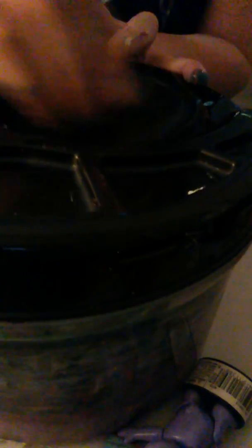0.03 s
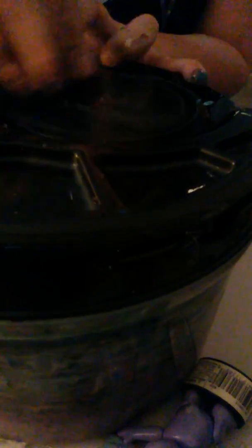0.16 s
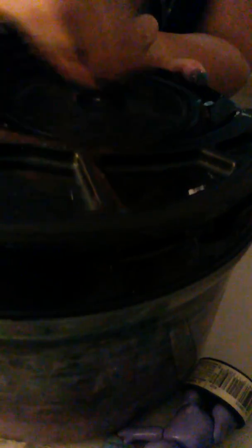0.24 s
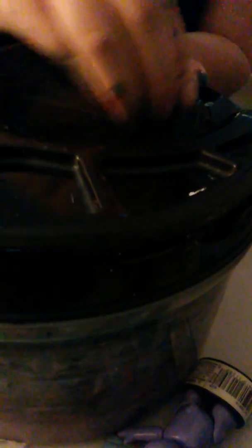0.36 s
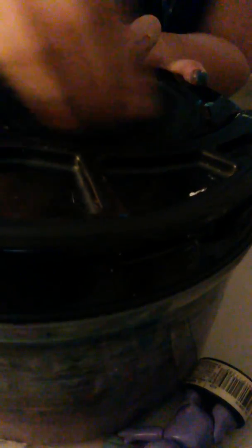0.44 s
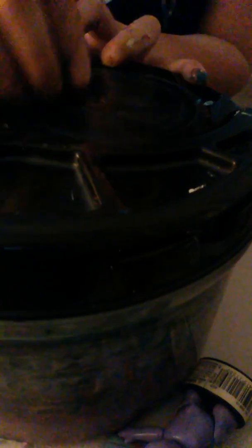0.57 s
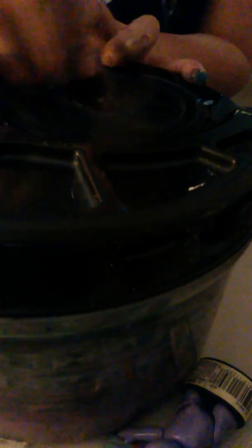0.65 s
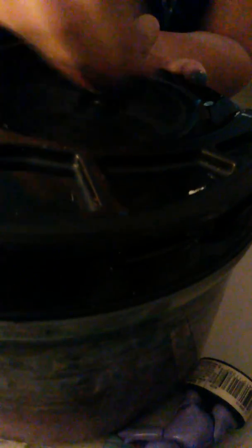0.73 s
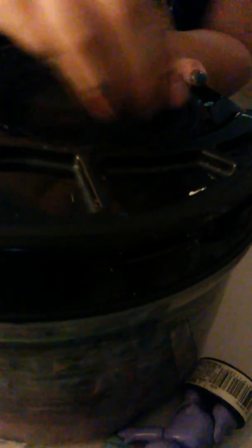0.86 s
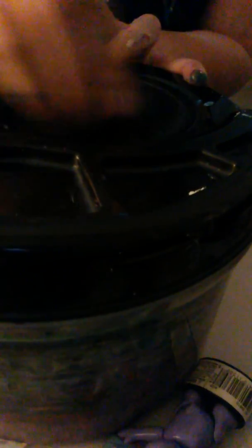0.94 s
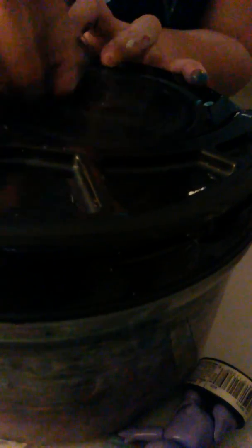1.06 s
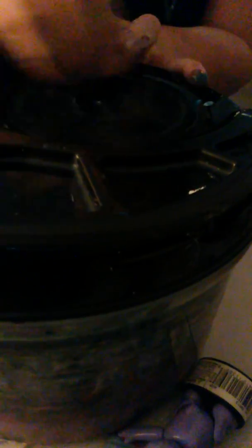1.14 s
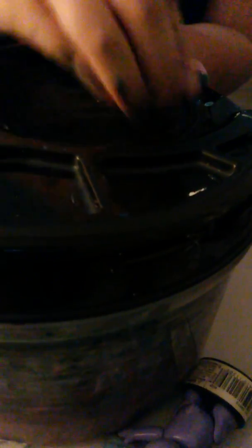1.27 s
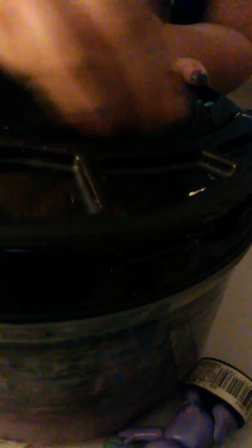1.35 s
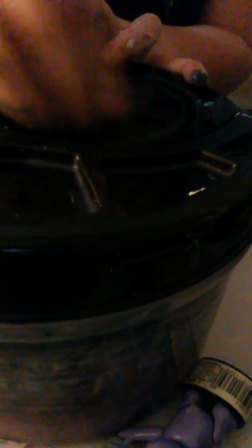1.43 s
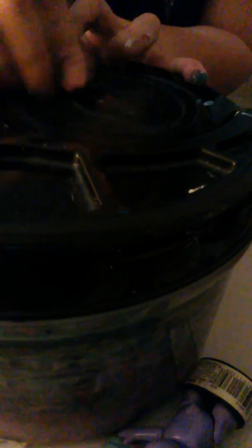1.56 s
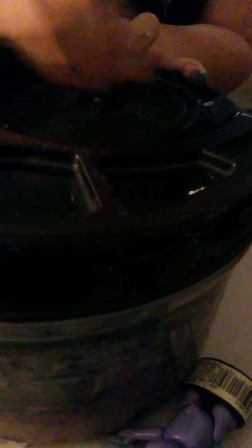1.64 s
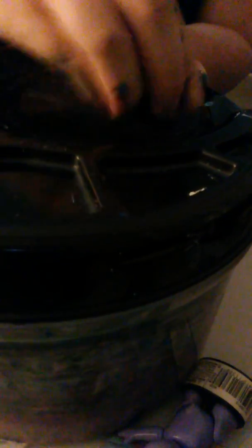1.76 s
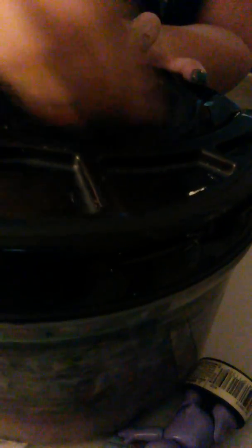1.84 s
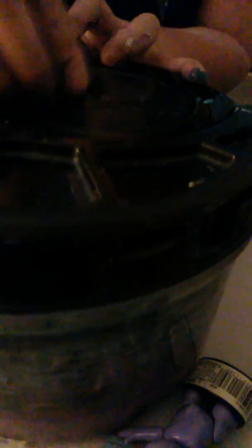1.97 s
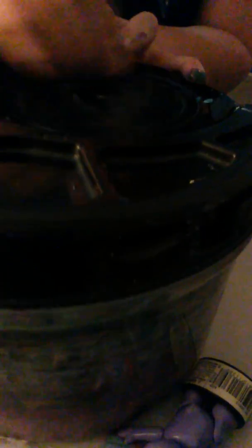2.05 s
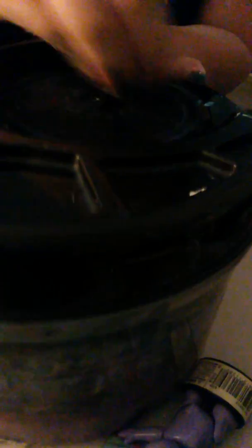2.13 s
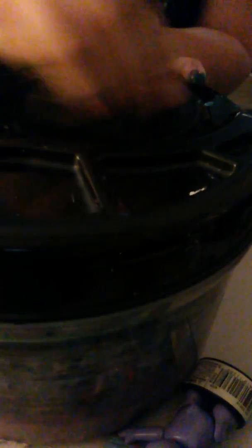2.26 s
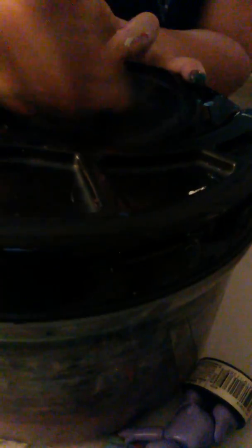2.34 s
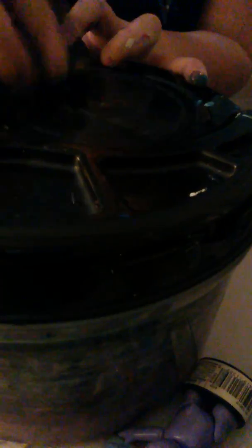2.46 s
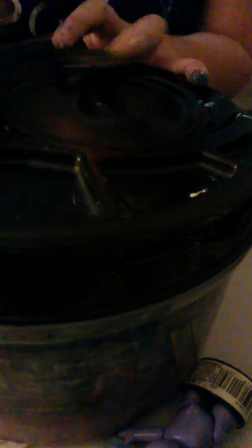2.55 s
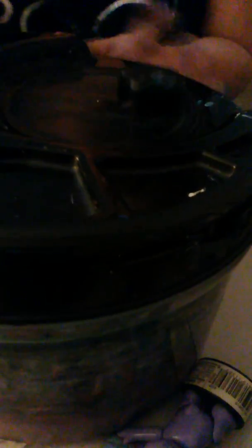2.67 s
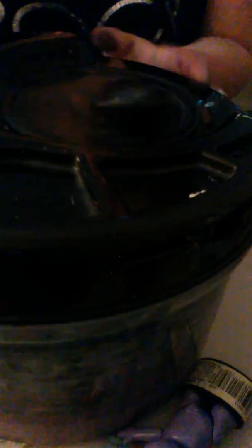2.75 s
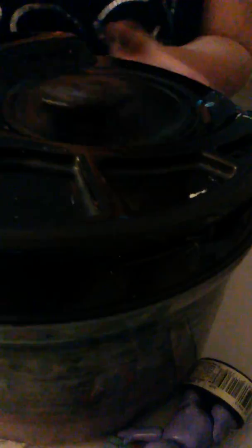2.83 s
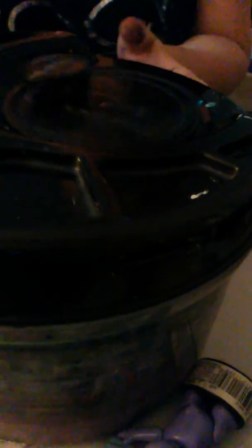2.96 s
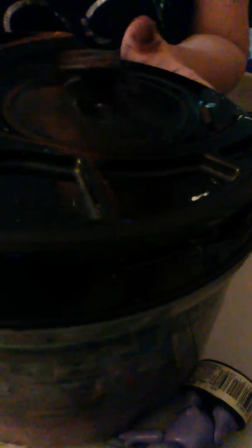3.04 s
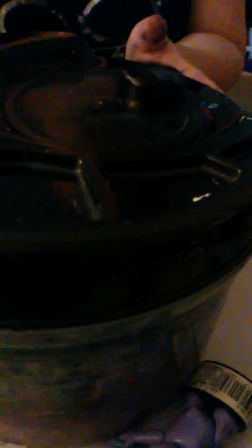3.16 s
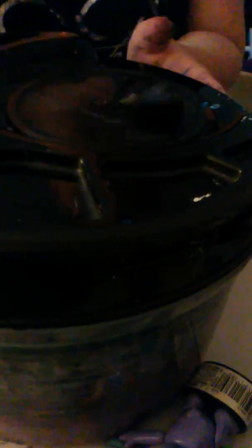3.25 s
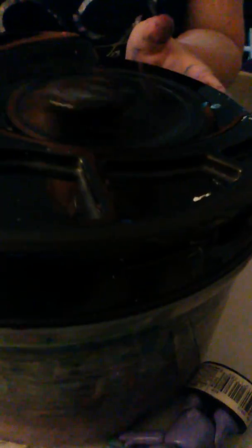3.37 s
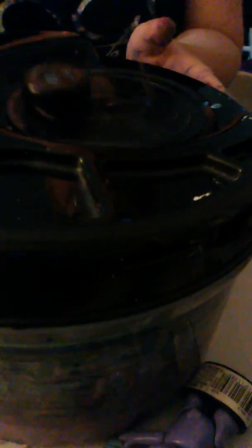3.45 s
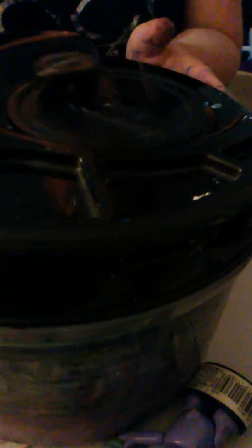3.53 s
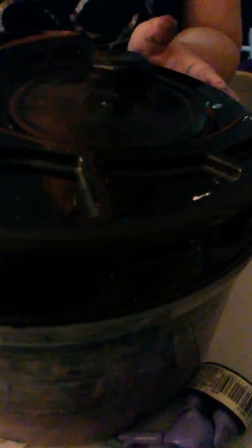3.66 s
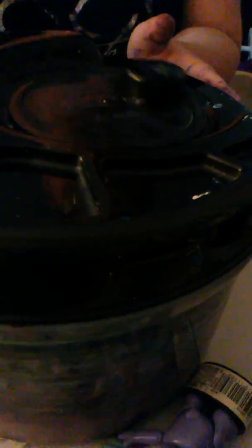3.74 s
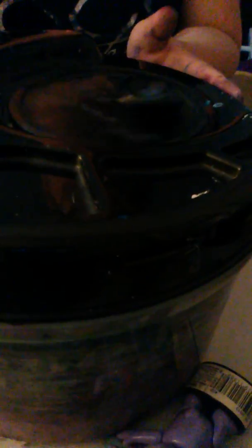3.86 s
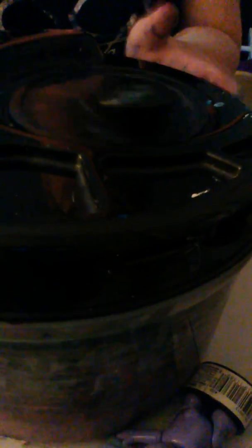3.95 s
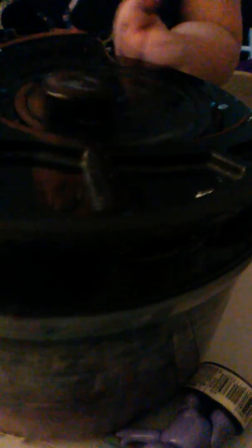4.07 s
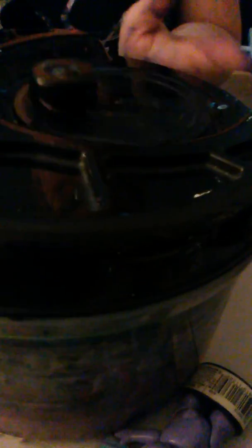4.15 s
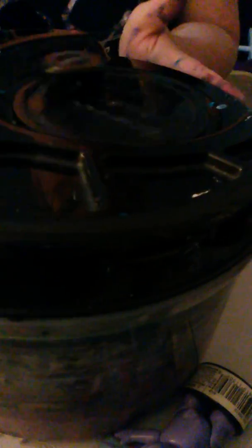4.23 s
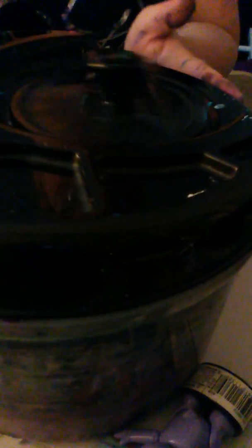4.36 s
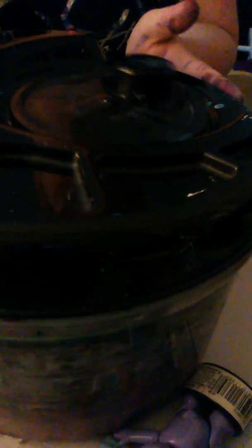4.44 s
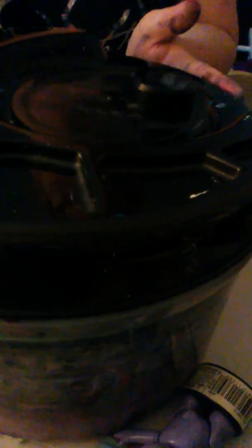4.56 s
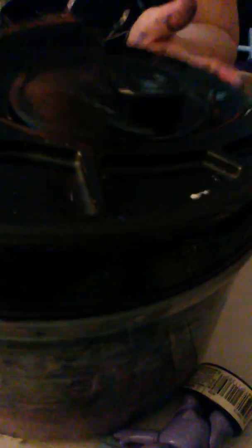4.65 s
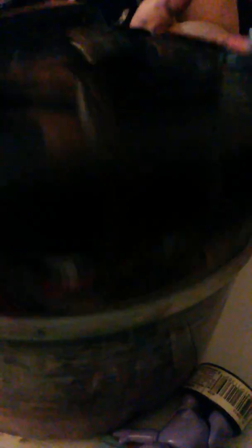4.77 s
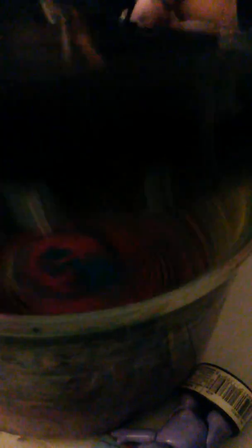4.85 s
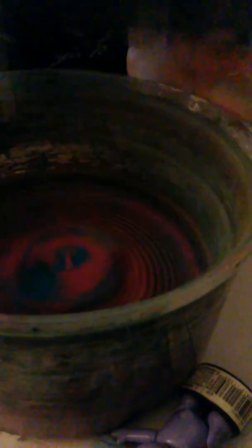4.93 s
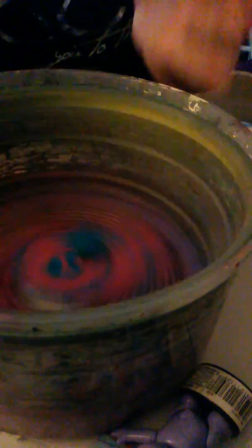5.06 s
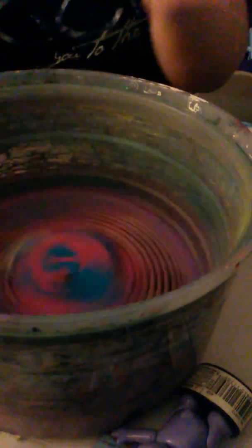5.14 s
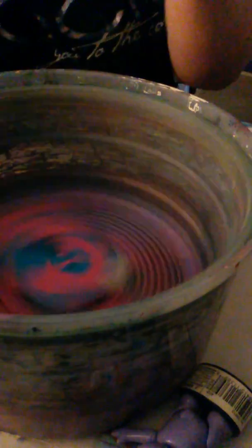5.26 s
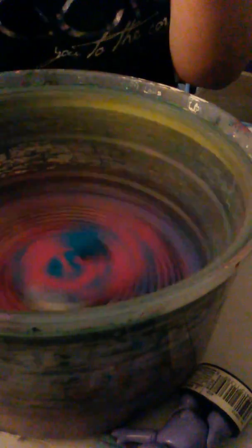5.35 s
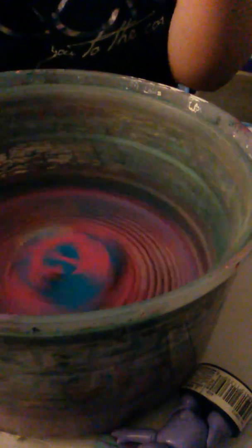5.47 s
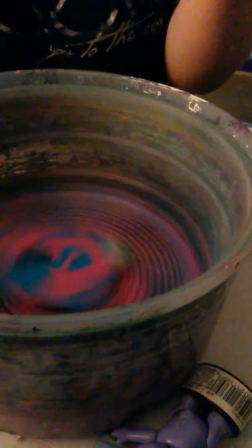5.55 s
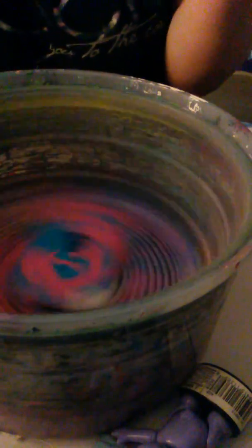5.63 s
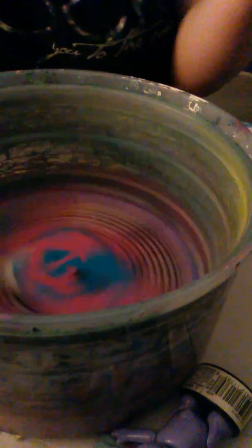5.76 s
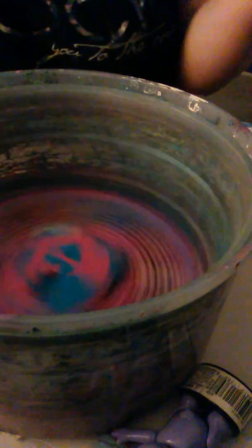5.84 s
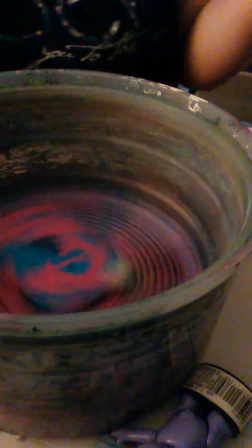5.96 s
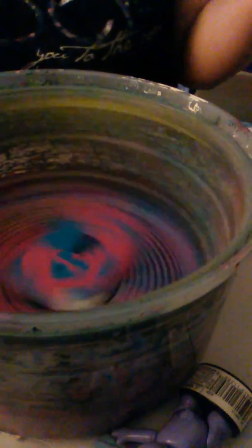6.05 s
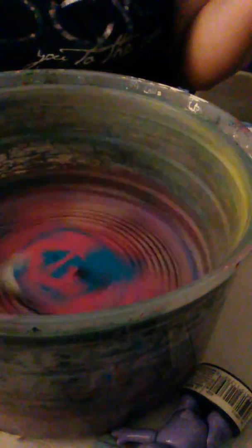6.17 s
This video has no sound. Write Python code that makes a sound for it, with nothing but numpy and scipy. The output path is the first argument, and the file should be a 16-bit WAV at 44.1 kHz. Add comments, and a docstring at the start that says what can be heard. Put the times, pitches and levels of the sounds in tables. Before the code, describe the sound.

A hollow plastic bowl rumbles in irregular surges as its basket is cranked, gears whirring low and thudding against the lid. Let go, it rattles loosely and gradually weakens, with small clicks and rubbing swishes. The lid is pulled away with a rapid crackling clatter and bright hiss; a few small knocks and cloth-like rustles follow. Close microphone, short indoor room tail, very faint background hush.

```python
"""Indoors, a plastic salad spinner is cranked by hand: basket and gears rumble and chatter in the hollow bowl.
The knob is let go and the basket coasts with a loose rattle; then the lid is pulled off with a clatter,
leaving a hiss of sliding plastic at first, then soft rustles, probably of clothing, and faint ticks.
Random contacts and impacts drive filters that stand for bowl, lid, edges and axle; a short room tail
and a faint hush surround them."""
import sys
import numpy as np
from scipy import signal
from scipy.fft import rfft, irfft, next_fast_len
from scipy.io import wavfile
from scipy.ndimage import uniform_filter1d, map_coordinates

SR = 44100
rng = np.random.default_rng(int(sys.argv[2]) if len(sys.argv) > 2 else 0)


def unload_wav(signal):
    """Save mono or channel-first audio to the path in sys.argv[1] as 16-bit WAV at rate SR, clipped to [-1, 1]."""
    wavfile.write(
        sys.argv[1],
        SR,
        np.round(np.clip(np.atleast_2d(signal).T, -1, 1) * 32767).astype(np.int16),
    )


N = 273420

# Times in seconds: the knob is let go, the lid leaves the bowl.
STAGE_STARTS_S = [2.54, 4.72]
# Responses of the bowl when cranked, coasting and open. Each row: frequency in Hz, relative level in dB.
CRANKED_BOWL = [(25, -45), (45, -54.5), (75, -19), (105, -5), (145, 0.5), (225, 0.5), (300, -5.5),
                (400, 0.5), (500, -7), (570, -18.5), (660, -40.5), (1000, -66)]
COASTING_BOWL = [(25, -50.5), (55, -16), (100, -7.5), (150, -1), (240, 0.5), (330, 3.5), (490, -1.5),
                 (570, -11.5), (660, -30), (800, -21.5), (1200, -73)]
OPENED_BOWL = [(25, -56.5), (80, -12.5), (170, -12.5), (260, -3.5), (330, 1), (430, -4.5), (500, -3.5),
               (570, -21), (680, -43), (1200, -70.5)]
# Responses of hard edges, bright snaps and hiss. Each row: frequency in Hz, relative level in dB.
EDGE_RESPONSE = [(1200, -33), (1900, -3.5), (2250, 3), (2550, 8), (2900, 1), (3400, -4.5), (3900, -13),
                 (4400, -5), (4900, -15.5), (5600, 0), (7500, -29)]
SNAP_RESPONSE = [(3500, -46), (4900, -12), (5600, -6.5), (7000, 0.5), (8200, -5), (10700, 8.5),
                 (13000, 1.5), (16000, -1)]
HISS_RESPONSE = [(2760, -46.5), (4700, -29), (4870, -44.5), (5230, -16), (5480, -17), (6070, -14.5),
                 (7270, -7.5), (8130, -11.5), (10700, 2), (14500, -6), (15400, -13), (16000, -4)]
# Lid resonances when seated, riding loose and lifted. Each row: centre in Hz, width in Hz, relative level in dB.
SEATED_LID = [(860, 76, 2.5), (964, 99, 1), (1100, 76, -9), (1398, 188, -3.5), (1473, 67, 5),
              (1574, 83, -1.5)]
RIDING_LID = [(831, 90, -2), (983, 140, 5), (1115, 110, -2), (1460, 390, -7.5), (1520, 140, 1.5),
              (1760, 100, -6.5)]
LIFTED_LID = [(901, 81, -12.5), (1086, 70, 2), (1270, 216, 0.5), (1369, 98, 4), (1546, 54, 3.5),
              (1690, 80, -20), (1663, 30, 1.5)]


def amp(db):
    """Decibels to gain."""
    return 10 ** (np.asarray(db) / 20)


def unit(x):
    """x at rms 1."""
    return x / np.sqrt(np.mean(x ** 2) + 1e-20)


def along(points, hz):
    """(Hz, value) points read on a log frequency axis."""
    f, v = np.transpose(points)
    return np.interp(np.log(hz + 1), np.log(f + 1), v)


def curves(rows):
    """One value per sample for each column after the time."""
    s, *cols = np.transpose(rows)
    return [np.interp(np.arange(N) / SR, s, c) for c in cols]


def wobble(rate):
    """A smooth random curve, rate knots a second."""
    knots = rng.standard_normal(int(N * rate / SR) + 4)
    return map_coordinates(knots, [np.arange(N) * rate / SR])


def body(spectrum, size=8192):
    """Causal, minimum-phase impulse response of a body with this spectrum."""
    gain = amp(along(spectrum, np.fft.rfftfreq(size, 1 / SR)))
    cepstrum = irfft(np.log(gain))
    cepstrum[1:size // 2] *= 2
    cepstrum[size // 2 + 1:] = 0
    return irfft(np.exp(rfft(cepstrum)))[:size // 2]


def focus(hz, centre_hz, db_per_octave):
    """Level change in dB, negative for resonances away from those that a contact excites best."""
    return -db_per_octave * np.abs(np.log2(hz / centre_hz))


def struck(spectrum, centre_hz, db_per_octave):
    """A body's response to a contact that favours the resonances near centre_hz."""
    return body([(hz, db + focus(hz, centre_hz, db_per_octave)) for hz, db in spectrum])


def shell(modes, size=4096):
    """Impulse response of the lid, which radiates mainly around its resonances."""
    f = np.fft.rfftfreq(size, 1 / SR)
    response = 0
    for k, (hz, width_hz, db) in enumerate(modes):
        resonance = 1j * f * width_hz / (hz * hz - f * f + 1j * f * width_hz)
        response = response + (-1) ** k * amp(db) * resonance
    radiation = signal.butter(3, [760, 1900], "bandpass", fs=SR, output="sos")
    return signal.sosfilt(radiation, irfft(response))


def contacts(rate, spread_db, smooth):
    """Tiny impacts at random times and of uneven size, over a share of smooth friction."""
    sizes = amp(spread_db * np.clip(rng.standard_normal(N), -2, 2)) * rng.choice([-1, 1], N)
    impacts = sizes * (rng.random(N) < rate / SR)
    return unit(impacts) + smooth * rng.standard_normal(N)


def ring(force, response):
    """A body driven by a force, at rms 1."""
    return unit(signal.fftconvolve(force, response)[:N])


def blow(response, t60, scuff, rise, size=6000, count=440):
    """One impact with a short chatter after it, at rms 1 over its first 10 ms."""
    t = np.arange(size) / SR
    force = rng.standard_normal(size) * amp(-60 * t / t60) * (1 - np.exp(-t / rise))
    force *= scuff / np.linalg.norm(force)
    force[0] += 1
    sound = signal.fftconvolve(force, response)[:size]
    return sound / np.sqrt(np.mean(sound[:count] ** 2))


def add(track, s, sound):
    """Mix a sound into the track at time s."""
    part = track[round(s * SR):][:len(sound)]
    part += sound[:len(part)]


def band(centre_hz, width_hz):
    """Narrow noise of rms 1 around a moving centre."""
    phase = 2 * np.pi * np.cumsum(centre_hz) / SR
    return unit(wobble(width_hz) * np.cos(phase) + wobble(width_hz) * np.sin(phase))


def patchy(x, depth_db, size=512, count=3):
    """A smooth random gain over pitch and time makes the sound swell and fade in patches; rms 1."""
    z = signal.stft(x, nperseg=size)[2]
    field = uniform_filter1d(rng.standard_normal(z.shape), count, 0)
    field = uniform_filter1d(field, 2 * count, 1)
    shaped = signal.istft(z * amp(depth_db * unit(field)), nperseg=size)[1]
    return unit(shaped[:len(x)])


def swell(s, length):
    """Envelope of a contact that is full at time s, sags from then on and dies away after its length."""
    attack_s, release_s, sag_db_per_s = 0.02, 0.05, 16.5
    t = np.arange(N) / SR - s
    attack = np.clip(1 + t / attack_s, 0, 1)
    sag = amp(-sag_db_per_s * np.maximum(t, 0))
    return attack * sag * np.exp(-np.maximum(t - length, 0) / release_s)


def stages():
    """Weights per sample of the three stages: cranked, coasting, open."""
    stage = np.searchsorted(STAGE_STARTS_S, np.arange(N) / SR)
    return uniform_filter1d(np.eye(3)[:, stage], size=440, axis=1)  # 10 ms crossfade


def hush():
    """Faint steady room noise: white noise through a fixed spectrum."""
    # Each row: frequency in Hz, relative level in dB.
    hush_response = [(20, -25.5), (55, -6.5), (120, -3), (220, -19.5), (480, -5), (700, -19.5),
                     (2600, -20.5), (4700, -28), (10000, -6.5), (16000, -14)]
    return amp(-64.5) * ring(rng.standard_normal(N), body(hush_response))


def room(x):
    """A small room's tail, 5 ms late; each frequency dies at its own speed."""
    # Each row: frequency in Hz, 60 dB decay time in seconds.
    decay_s = [(150, 0.26), (1500, 0.31), (5000, 0.35), (14000, 0.15)]
    hz, t, z = signal.stft(rng.standard_normal(SR // 2), SR, nperseg=256)
    fade = amp(-60 * t / along(decay_s, hz)[:, None])
    tail = signal.istft(z * fade, SR, nperseg=256)[1]
    delayed = np.pad(x, (SR // 200, 0))
    return signal.fftconvolve(delayed, tail / np.linalg.norm(tail))[:N]


def rock():
    """The bowl is nudged once on the table: a dull thump of noise through the whole bowl."""
    # Each row: frequency in Hz, relative level in dB.
    base_response = [(25, -52), (70, -5), (140, 1.5), (200, -1.5), (400, -46)]
    centre_s, width_s, level_db = 4.14, 0.046, -32
    tilt = np.exp(-((np.arange(N) / SR - centre_s) / width_s) ** 2 / 2)
    return amp(level_db) * tilt * ring(rng.standard_normal(N), body(base_response))


def axle():
    """The axle rubs in its seat; when it presses harder, a gritty swish rises out of the rub."""
    # Each row: time in seconds, rub level in dB.
    rub_level = [(0, -56), (0.75, -52.5), (1.1, -59), (1.25, -58), (1.58, -59.5), (1.9, -53.5), (2.1, -59),
                 (2.4, -53.5), (2.56, -49.5), (2.8, -56.5), (3.9, -60), (4.12, -54.5), (4.4, -59.5),
                 (4.7, -53.5), (5.13, -57.5), (5.7, -79.5)]
    # Each row: frequency in Hz, relative level in dB.
    rub_response = [(1700, -28.5), (2100, -14.5), (2500, 5.5), (2850, -1), (3400, -3), (3900, -22.5),
                    (4400, -7.5), (4900, -27), (5500, -12.5), (6500, -43)]
    # Hard presses. Each row: start in seconds, length in seconds, level in dB.
    swishes = [(0.17, 0.12, -54), (0.56, 0.05, -50), (1.02, 0.027, -48.5), (1.22, 0.04, -50),
               (1.44, 0.042, -54), (1.83, 0.047, -52), (1.95, 0.035, -54), (2.275, 0.07, -48.5),
               (2.42, 0.069, -53), (2.87, 0.084, -53.5), (3.35, 0.11, -54), (3.81, 0.06, -54.5),
               (4.05, 0.057, -47), (4.58, 0.12, -57.5)]
    start_hz, rise_hz, rise_s = 2750, 510, 0.044  # a swish climbs as the pressure builds
    rub_db, = curves(rub_level)
    rub_contacts = contacts(rate=1700, spread_db=8, smooth=0.35)
    rub = patchy(ring(rub_contacts, body(rub_response)), depth_db=4.0)
    pressure = np.array([amp(db) * swell(s, length) for s, length, db in swishes])
    strongest_start_s = np.array(swishes)[pressure.argmax(axis=0), 0]
    age_s = np.maximum(np.arange(N) / SR - strongest_start_s, 0)
    swish_hz = start_hz + rise_hz * (1 - np.exp(-age_s / rise_s))
    grit = patchy(band(swish_hz, width_hz=850) * amp(4.8 * wobble(260)), depth_db=5.0)
    return amp(rub_db + 1.8 * wobble(30)) * rub + pressure.sum(axis=0) * grit


def slide():
    """Fine, grainy hiss of sliding plastic that sinks while coasting; later soft rustles, probably of clothing."""
    # Hiss with the lid off: sliding plastic at first, then soft rustles. Each row: time in seconds, level in dB.
    open_level = [(4.72, -39.5), (4.76, -31), (4.9, -44), (5.02, -46), (5.14, -52), (5.25, -41.5),
                  (5.37, -42.5), (5.45, -50.5), (5.57, -44.5), (5.63, -52), (5.71, -40), (5.79, -54),
                  (6.0, -48.5), (6.09, -40.5), (6.14, -43.5), (6.2, -50.5)]
    cranked_db, release_db, sag_db, sag_s = -49.5, -48, 5.5, 0.7
    open_db, = curves(open_level)
    cranked, coasting, opened = stages()
    free_s = np.maximum(np.arange(N) / SR - STAGE_STARTS_S[0], 0)
    coasting_db = release_db - sag_db * (1 - np.exp(-free_s / sag_s))
    slide_db = cranked * cranked_db + coasting * coasting_db + opened * open_db
    grain = contacts(rate=900, spread_db=10.0, smooth=1.3)
    hiss = patchy(ring(grain, body(HISS_RESPONSE)), depth_db=2.9)
    return amp(slide_db + 2.6 * wobble(45)) * hiss


def scrape():
    """The lid's edge catches and slips on the rim as it is pulled off: a dense run of contacts."""
    start_s, length_s, level_db = 4.74, 0.19, -43
    slips = contacts(rate=310, spread_db=6, smooth=.25)
    scraped = ring(slips, body(EDGE_RESPONSE)) + 0.8 * ring(slips, body(SNAP_RESPONSE))
    return amp(level_db) * swell(start_s, length_s) * scraped


def grazes(count=5):
    """(s, dB) of one graze per revolution of the slowing basket, each revolution longer than the last."""
    start_s, revolution_s, slowing, graze_db = 3.323, 0.131, 1.024, -35.5  # dB as in the tick table
    return [(start_s + revolution_s * np.sum(slowing ** np.arange(k)), graze_db) for k in range(count)]


def ticks():
    """The rim grazes the wall too lightly to move the bowl: short bright blows through the hiss response."""
    # Stray ticks of the basket's rim. Each row: time in seconds, level in dB before the common trim.
    stray_ticks = [(0.6794, -33.5), (0.883, -35.5), (1.8921, -40), (1.9495, -33), (2.123, -36.5),
                   (3.3862, -38), (4.098, -29), (4.182, -35.5), (4.4059, -36.5), (4.4593, -33.5),
                   (4.6365, -26.5), (4.6906, -32.5), (5.8177, -37.5)]
    trim_db = -7.0
    out, rim = np.zeros(N), body(HISS_RESPONSE)
    for s, db in list(stray_ticks) + grazes():
        add(out, s, amp(db + trim_db) * blow(rim, t60=0.055, scuff=8, rise=0.0023))
    return out


def knocks():
    """Crank, basket and lid knock: each thuds in the bowl, rings the lid, clacks and snaps at hard edges."""
    # Each row: time in seconds, bowl thud in dB, lid ring in dB, ring centre in Hz, edge clack in dB,
    # clack centre in Hz, snap in dB; all levels before the trims below.
    knock_rows = [(0.531, -44, -51, 1570, -26, 2800, -21.5), (0.604, -9, -30.5, 1150, -34, 2800, -49),
                  (0.728, -22, -41, 1020, -65, 2800, -49), (0.746, -10.5, -43, 1060, -46, 2800, -44),
                  (0.792, -17.5, -29.5, 1370, -33, 2800, -55), (0.799, -31.5, -22.5, 1440, -50, 2500, -53),
                  (1.086, -15, -49, 1420, -65, 3000, -46), (1.2, -13, -34.5, 1453, -47.5, 3100, -57),
                  (1.211, -28, -26.5, 1490, -42, 2800, -61), (1.321, -38, -27.5, 1430, -27.5, 4300, -33),
                  (1.639, -12, -38, 1200, -39, 3000, -48), (1.69, -13.5, -39.5, 1340, -40.5, 3000, -32),
                  (1.989, -18, -51, 1070, -46, 2600, -55), (2.172, -25, -42.5, 1388, -47.5, 2700, -39),
                  (2.482, -17, -28.5, 1060, -34.5, 2900, -62), (2.545, -11.5, -29, 1180, -27.5, 2900, -60),
                  (2.55, -16, -27, 1409, -29.5, 3000, -32.5), (2.67, -21.5, -28, 1000, -41.5, 2800, -38),
                  (2.746, -27.5, -33, 950, -67, 3100, -63), (3.009, -38, -33, 1010, -43, 2900, -42),
                  (3.226, -20.5, -55, 1070, -47.5, 2900, -54), (3.453, -51, -26, 1310, -31, 2700, -29.5),
                  (3.563, -20, -36, 1023, -47, 2700, -48), (3.62, -25, -36, 1022, -52, 2600, -65.5),
                  (3.778, -20, -42, 1040, -48, 2600, -63), (3.923, -19.5, -35, 1130, -52.5, 2700, -64),
                  (4.031, -46, -42.5, 1300, -39.5, 2600, -35.5),
                  (4.111, -41.5, -22.5, 1520, -29.5, 3000, -37),
                  (4.34, -21.5, -34, 1012, -64.5, 2700, -56.5), (4.537, -36.5, -43, 1346, -34.5, 2600, -33),
                  (4.728, -14.5, -30.5, 1128, -24, 3100, -19), (4.742, -26, -35.5, 1118, -39, 3300, -20),
                  (4.806, -35, -32, 1260, -27.5, 3200, -21.5), (4.839, -28, -31.5, 1380, -25.5, 3400, -22),
                  (4.856, -31, -24, 1500, -29.5, 3200, -28), (4.885, -37, -39.5, 1620, -37.5, 3500, -25),
                  (4.925, -43.5, -32, 1440, -32, 3000, -45), (4.948, -30.5, -25.5, 1500, -24, 3000, -25.5),
                  (4.978, -45, -37.5, 1510, -29.5, 3300, -29.5), (5.046, -40.5, -34, 1510, -43, 3100, -31),
                  (5.096, -47, -31, 1460, -34.5, 2800, -42), (5.112, -51, -33.5, 1550, -41.5, 2800, -32.5),
                  (5.183, -43, -34.5, 1290, -35.5, 2500, -36), (5.221, -40, -39.5, 1280, -44, 2700, -23.5),
                  (5.232, -42, -24, 1170, -33, 2700, -47), (5.286, -64, -50, 1500, -40, 2700, -48),
                  (5.401, -50, -28.5, 1462, -38.5, 2500, -46.5),
                  (5.514, -56.5, -41, 1330, -48.5, 2400, -58.5),
                  (5.952, -82.5, -75, 1380, -62.5, 2900, -49.5)]
    # 60 dB decay in seconds of the lid's judder after a knock: cranked, coasting, open.
    judder_s = [0.081, 0.041, 0.064]
    thud_hz, lead_s = 393, 0.002  # the lid is brushed just before a knock lands
    out = np.zeros(N)
    bowl_spectra = CRANKED_BOWL, COASTING_BOWL, OPENED_BOWL
    bowls = [struck(b, thud_hz, db_per_octave=6.5) for b in bowl_spectra]
    lids = SEATED_LID, RIDING_LID, LIFTED_LID
    snap = body(SNAP_RESPONSE)
    for s, thud_db, ring_db, ring_hz, clack_db, clack_hz, snap_db in knock_rows:
        stage = np.searchsorted(STAGE_STARTS_S, s)
        # ring and clack centres favour nearby resonances; the edge's levels also vary at random
        lid = shell([(hz, width, db + focus(hz, ring_hz, db_per_octave=36.0)) for hz, width, db in lids[stage]])
        edge = body([(hz, db + focus(hz, clack_hz, db_per_octave=13.5) + rng.normal(0, 6.6))
                     for hz, db in EDGE_RESPONSE])
        add(out, s, amp(thud_db - 4.0) * blow(bowls[stage], t60=0.016, scuff=0.87, rise=0.0024))
        add(out, s - lead_s, amp(ring_db - 3.0) * blow(lid, t60=judder_s[stage], scuff=.9, rise=0.0055))
        add(out, s, amp(clack_db - 3.26) * blow(edge, t60=0.061, scuff=1.64, rise=0.0013))
        add(out, s, amp(snap_db - 4.0) * blow(snap, t60=0.061, scuff=6, rise=0.00052))
    return out


def pitch_swing(knots_s):
    """An irregular cosine swing between -1 and 1; the knots are not in strict time order."""
    return np.cos(2 * np.pi * np.interp(np.arange(N) / SR, knots_s, np.arange(len(knots_s))))


def surges():
    """Gains of rumble and chatter as the gears bite or rattle, and at last as the lid clatters off."""
    # The last row is the lid clattering as it is pulled off.
    # Each row: start in seconds, length in seconds, rumble in dB, chatter in dB.
    surge_rows = [(0.0, 0.02, -34.5, -55.5), (0.306, 0.19, -30, -55.5), (0.606, 0.055, -26, -47),
                  (0.744, 0.055, -21, -34), (0.943, 0.024, -25.5, -48.5), (1.222, 0.044, -24, -42.5),
                  (1.465, 0.015, -34.5, -48), (1.656, 0.035, -21.5, -42), (1.755, 0.035, -36, -41),
                  (1.821, 0.12, -28, -50), (2.187, 0.1, -36, -49.5), (2.326, 0.014, -29.5, -58.5),
                  (2.465, 0.025, -21.5, -52), (2.555, 0.09, -31, -38), (2.767, 0.041, -33.5, -47.5),
                  (3.021, 0.12, -28, -43), (3.294, 0.032, -32, -43), (3.556, 0.19, -27.5, -42.5),
                  (3.9, 0.021, -34, -41), (4.095, 0.14, -33, -42), (4.3, 0.084, -32, -49.5),
                  (4.624, 0.14, -34, -49), (4.852, 0.13, -47, -40)]
    shapes = np.array([swell(s, length) for s, length, _, _ in surge_rows])
    return amp(np.array(surge_rows)[:, 2:]).T @ shapes


def spin():
    """The basket bumps on its pivot and shakes the bowl; the gear teeth whirr and chatter in the lid."""
    # Roll of the basket while cranked, then coasting and dying away. Each row: time in seconds, level in dB.
    roll_level = [(0, -29.5), (0.12, -29.5), (0.45, -24.5), (0.92, -31.5), (1.4, -27), (1.6, -33.5),
                  (2.0, -29), (2.22, -31), (2.4, -28.5), (2.95, -39.5), (3.4, -31.5), (3.52, -38),
                  (4.3, -35), (4.55, -41.5), (4.9, -43), (5.1, -52), (5.7, -81)]
    # Chatter between surges, in dB over the roll: cranked, coasting, open.
    idle_chatter_db = [-30.5, -16, -5]
    # Knots in seconds of an irregular swing of the whirr's pitch, not in strict time order.
    swing_knots_s = [-0.61, 0.5, 0.72, 1.63, 1.52, 2.5, 2.5, 3, 3.5, 4.5, 4.5]
    roll_hz, surge_hz = 176, 360  # harder contact wakes higher resonances of the bowl
    whirr_centre_hz, whirr_swing_hz = 281, 50.18
    roll_db, = curves(roll_level)
    cranked, coasting, opened = weights = stages()
    rumble_surge, chatter_surge = surges()
    chatter_gain = np.hypot(amp(roll_db + np.dot(idle_chatter_db, weights)), chatter_surge)
    whirr_hz = whirr_centre_hz + whirr_swing_hz * pitch_swing(swing_knots_s)
    out = np.zeros(N)
    for gain, centre_hz in (amp(roll_db), roll_hz), (rumble_surge, surge_hz):
        # under load the teeth stay in touch; with slack they bounce in clusters
        driven = contacts(rate=700, spread_db=2.5, smooth=0.51)
        loose = contacts(rate=230, spread_db=2.0, smooth=0.47) * amp(3.1 * wobble(55))
        whirr = band(whirr_hz, width_hz=36)
        cranked_rumble = ring(driven, struck(CRANKED_BOWL, centre_hz, db_per_octave=5.0))
        cranked_rumble = patchy(cranked_rumble, depth_db=4.0, size=1024)
        coasting_rumble = ring(loose, struck(COASTING_BOWL, centre_hz, db_per_octave=2))
        coasting_rumble = patchy(coasting_rumble, depth_db=2.5, size=1024)
        out += gain * cranked * (0.97 * cranked_rumble + 0.5 * whirr)
        out += gain * coasting * (0.98 * coasting_rumble + 0.43 * whirr)
        out += gain * opened * ring(loose, body(OPENED_BOWL))
    # the surge contacts, last in the loop, also drive the lid
    chatter = cranked * ring(driven, shell(SEATED_LID)) + opened * ring(driven, shell(LIFTED_LID))
    clack = 0.058 * ring(loose, body(EDGE_RESPONSE))  # bouncing teeth also clack
    chatter += coasting * (ring(loose, shell(RIDING_LID)) + clack)
    return out + chatter_gain * patchy(chatter, depth_db=3.5)


def scene():
    """The spinner close by, its room and a faint steady hush."""
    spinner = rock() + axle() + slide() + scrape() + ticks() + knocks() + spin()
    return (spinner + amp(-13.0) * room(spinner) + hush())[None]


def record(dry):
    """Band limit: nothing at or above top_hz passes."""
    top_hz = 16000
    size = next_fast_len(N + SR // 2)
    passed = np.fft.rfftfreq(size, 1 / SR) < top_hz
    return irfft(rfft(dry, size) * passed, size)[:, :N]


dry = scene()
out = record(dry)
unload_wav(out)
```